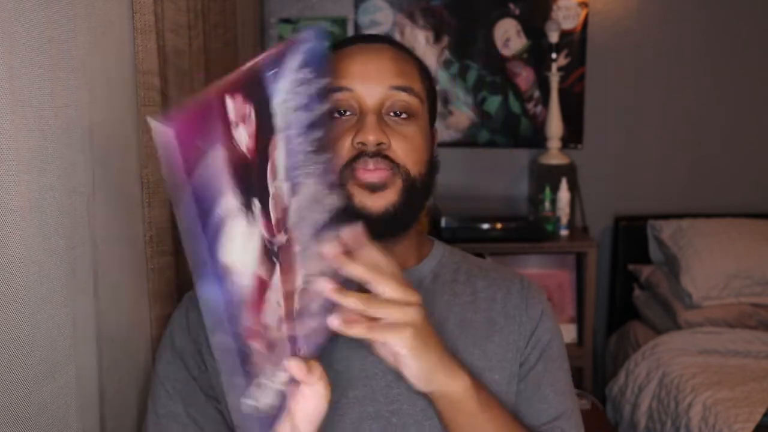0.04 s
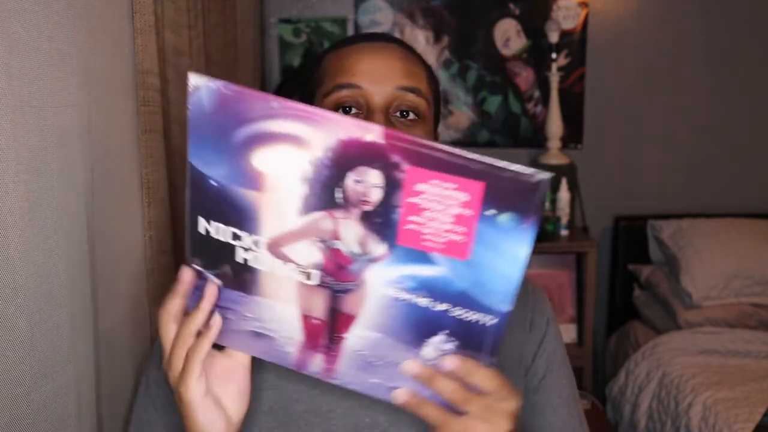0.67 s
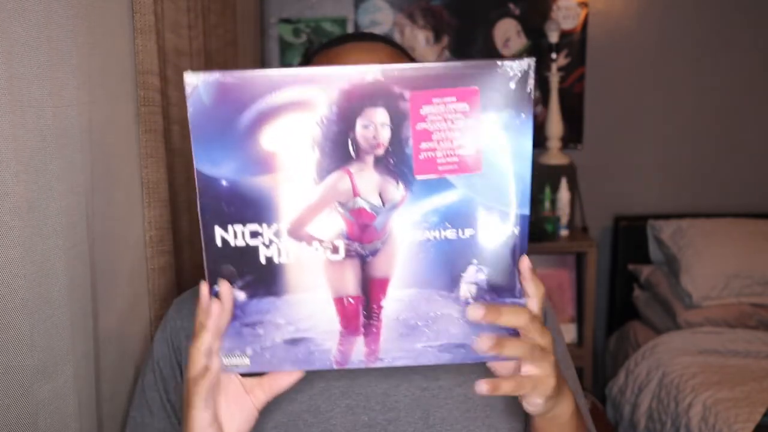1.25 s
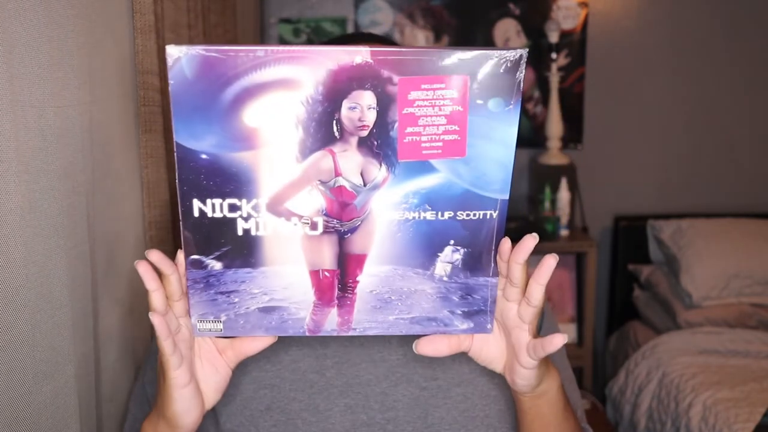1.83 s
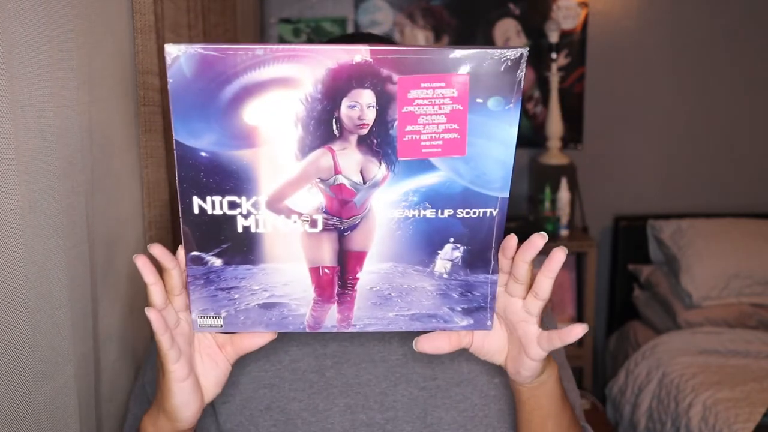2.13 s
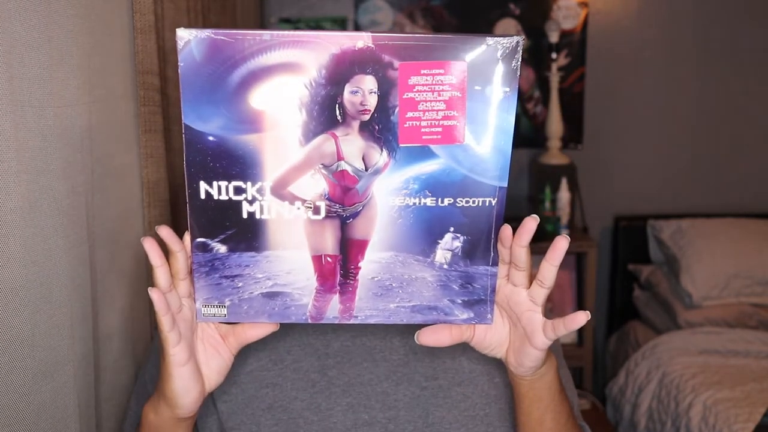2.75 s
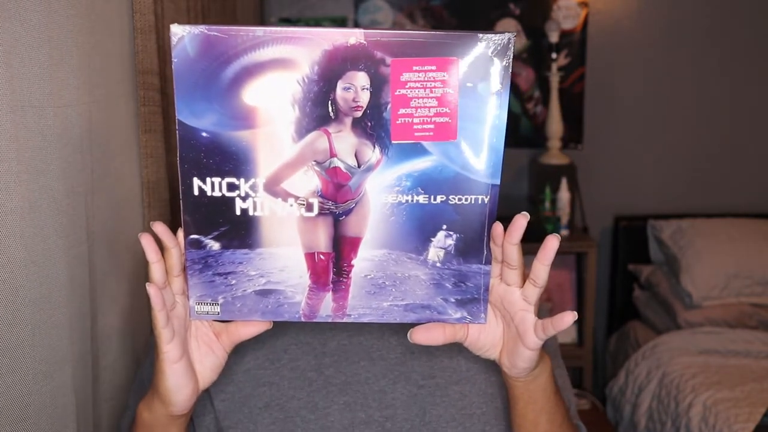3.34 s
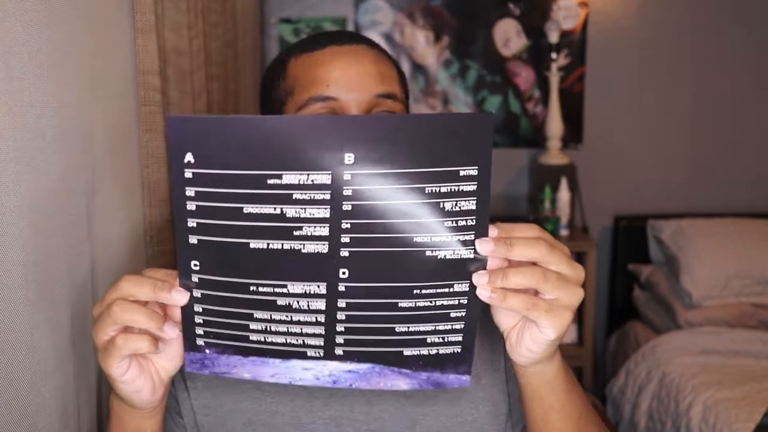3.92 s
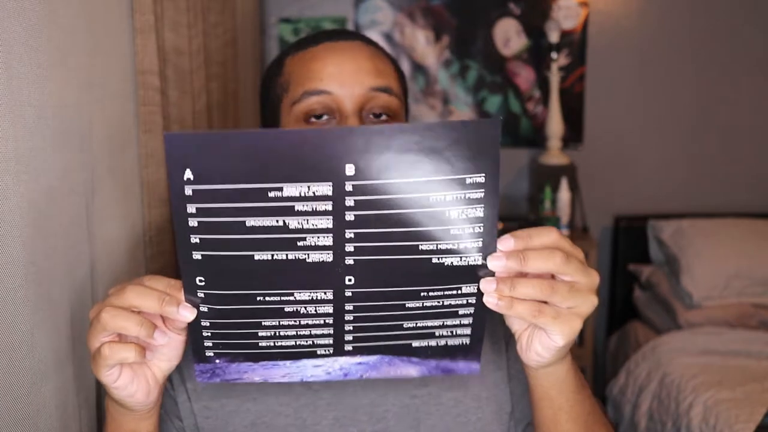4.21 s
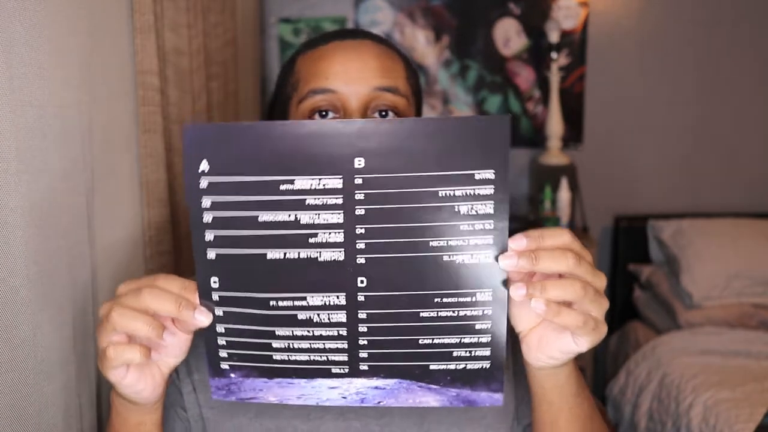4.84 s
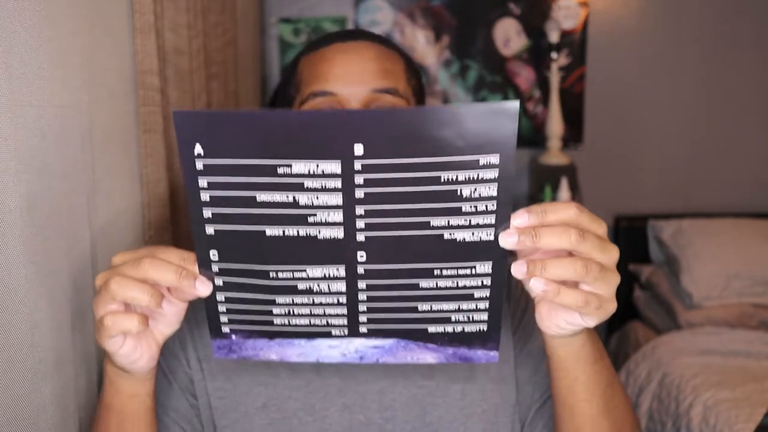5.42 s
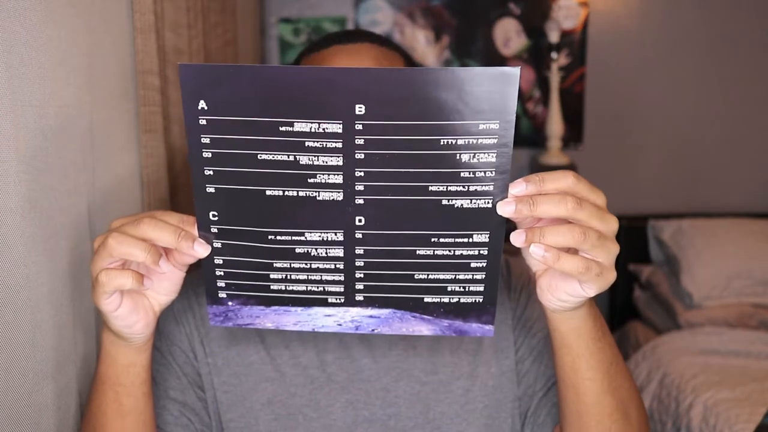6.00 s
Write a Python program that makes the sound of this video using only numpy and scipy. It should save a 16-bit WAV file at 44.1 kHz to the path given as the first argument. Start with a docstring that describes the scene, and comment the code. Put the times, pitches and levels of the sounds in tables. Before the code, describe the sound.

A ventilation fan hums low and steady throughout, with a soft rush of air in a small bedroom. Right at the start, close to the microphone, a shrink-wrapped record sleeve is turned in the hands with a sharp snap and a brief rasp. Fingers hiss across the plastic and drag on the card beneath, with a cluster of crackles, strongest from about 0.5 to 0.9 seconds. Lighter strokes fade out by 1.5 seconds, leaving only the fan. From about 3.75 to 4.6 seconds, a stiff paper insert gives a handful of light clicks as it flexes, among short, soft fingertip rustles with a slight squeak. A faint, smoother paper rustle swells from around 5 seconds and peaks just before the end at 6 seconds. The paper is quieter than the plastic, and both have only a short, slight room echo.

```python
"""A small bedroom, where a ventilation fan hums and its rushing air fills the room's low resonances.
Close to the microphone, hands turn over a shrink-wrapped record sleeve. Fingers hiss across the
plastic film, drag on the card beneath and make the wrap buckle with sharp snaps.
Later a stiff paper insert is held up: it rustles under the fingertips and clicks as it flexes."""
import sys
import numpy as np
from scipy import signal
from scipy.fft import rfft, irfft
from scipy.io import wavfile

SR = 44100
rng = np.random.default_rng(int(sys.argv[2]) if len(sys.argv) > 2 else 0)


def dump(signal):
    """Clip the signal to [-1, 1] and save it as 16-bit WAV at the path in sys.argv[1]."""
    limited = np.clip(np.atleast_2d(signal).T, -1, 1)
    pcm = np.round(limited * 32767).astype(np.int16)
    wavfile.write(sys.argv[1], SR, pcm)


N = 267687
TIME = np.arange(N) / SR
HZ = np.maximum(np.arange(N // 2 + 1) * SR / N, 1)


def from_db(db):
    """Turn decibels into a gain to multiply by."""
    return 10 ** (np.asarray(db) / 20)


def unit_power(x):
    """Scale a signal so its average power is 1."""
    return x / np.sqrt(np.mean(x ** 2) + 1e-20)


def gain_curve(points):
    """Join (Hz, dB) points into a gain for every frequency."""
    hz, db = np.transpose(points)
    return from_db(np.interp(np.log(HZ), np.log(hz), db))


def drift(rate_hz):
    """A slow random wobble, about 1 in size."""
    return unit_power(irfft(rfft(rng.standard_normal(N)) / (1 + (HZ / rate_hz) ** 2), N))


def resonate(x, hz, width_hz):
    """Ring at one pitch; a narrower width rings longer."""
    r = np.exp(-np.pi * width_hz / SR)
    feedback = [1, -2 * r * np.cos(2 * np.pi * hz / SR), r * r]
    return signal.lfilter(np.array([1, 0, -1]) * (1 - r * r) / 2, feedback, x + 1e-18)


def ring(x, modes):
    """Shake an object so all its modes (natural pitches) ring together."""
    return sum((-1) ** k * from_db(db) * unit_power(resonate(x, hz, width))
               for k, (hz, width, db) in enumerate(modes))


def stereo(pair, width, colour=1):
    """Make left and right from a mid (what both share) and a side (how they differ)."""
    mid, side = rfft(pair) * colour
    side = side * gain_curve(width)
    return irfft(np.array([mid + side, mid - side]), N)


def friction(slips_per_s, spread_db, smooth):
    """Skin sticks and slips: tiny uneven ticks over a smooth hiss."""
    slipping = rng.random(N) < slips_per_s / SR
    sizes = from_db(spread_db * np.minimum(rng.exponential(1, N), 4))
    ticks = unit_power(slipping * sizes * rng.choice([-1, 1], (2, N)))
    return unit_power(ticks + smooth * rng.standard_normal((2, N)))


def rub(peak_s, db, swell_s, fade_s, roundness=1.3):
    """A rub's loudness as the finger speeds up, then rests; roundness 1 is pointed, 2 is a bell."""
    from_peak = np.maximum((peak_s - TIME) / swell_s, (TIME - peak_s) / fade_s)
    return from_db(db) * np.exp(-np.minimum(from_peak, 8) ** roundness)


def together(gains):
    """Overlapping rubs add in power."""
    return np.sqrt(sum(gain ** 2 for gain in gains))


def flutter(rise_s, decay_s, size):
    """A quick dying shiver, evened out so it reaches every mode alike."""
    t = np.arange(size) / SR
    shape = (1 - np.exp(-t / rise_s)) * np.exp(-t / decay_s)
    spectrum = rfft(rng.standard_normal(size) * shape)
    shiver = irfft(spectrum / (np.abs(spectrum) + 1e-12), size) * shape ** .25
    return shiver / np.sqrt(np.sum(shiver ** 2))


def bedroom_echo(x, die_away_s=0.25, wall_hz=7000):
    """The walls return a short, soft tail, different on each side."""
    t = TIME[:SR // 2]
    tail = rng.standard_normal((2, len(t))) * from_db(-60 * t / die_away_s) * (t > .005)
    tail = signal.sosfilt(signal.butter(1, wall_hz, fs=SR, output="sos"), tail)
    return signal.fftconvolve(x, tail / np.sqrt(np.sum(tail ** 2) / 2), axes=1)[:, :N]


# Moving air. Each row: frequency in Hz, level in dB per Hz.
AIR_RUSH = [(12, -99), (29, -86), (42, -59), (78, -63.5), (140, -67), (250, -65), (420, -66.5), (520, -70),
            (700, -75), (900, -78.5), (1800, -87), (2080, -92.5), (7500, -104), (11000, -111),
            (15500, -113.5)]
# Room and duct resonances. Each row: pitch in Hz, width in Hz, peak level in dB per Hz.
ROOM_RESONANCES = [(54, 7.1, -58), (103, 7.3, -59), (119.6, 46, -57.5), (161.2, 15.4, -56),
                   (201, 9.3, -55.5), (209.4, 18, -59.5), (321, 4.7, -60.5), (334.4, 35, -64),
                   (417, 34, -61), (475.6, 15.5, -56), (535, 10, -66.5), (565.4, 15, -62.5),
                   (595, 13, -63.5), (618, 30.7, -63), (710, 27, -70), (759, 18, -69), (890, 13, -78.5),
                   (973, 19, -75.5), (1076, 17, -75.5), (1148, 25, -73.5), (1248, 17, -79), (1356, 29, -80),
                   (1670, 24, -84.5), (1903, 17, -84), (3970, 170, -101)]
# How wide the air sounds. Each row: frequency in Hz, side minus mid in dB.
ROOM_STEREO = [(40, -40), (110, -25), (200, -20.5), (380, -13.5), (480, -21), (620, -16.5), (900, -9),
               (1400, -6.5), (1850, -2.5), (2200, -1.5), (3000, 1.5), (6000, 0.5), (15000, 0.4)]
# Motor and mains hum. Each row: pitch in Hz, average level in dB.
HUM_TONES = [(36.5, -52), (58.6, -47.5), (113.6, -43), (119.9, -43.5), (170.6, -44), (340, -50)]

def fan(wander_hz=0.256, throb_db=-0.5, left_db=0.25):
    """Rushing air stirs the room's resonances while the motor's tones waver slightly."""
    power = gain_curve(AIR_RUSH) ** 2
    for hz, width, db in ROOM_RESONANCES:
        power += (from_db(db) / (1 + 2 * ((HZ - hz) / width) ** 2)) ** 2
    noise = rng.standard_normal((2, N)) * np.sqrt(SR / 2)
    air = stereo(noise, ROOM_STEREO, np.sqrt(power))
    hum = 0
    for hz, db in HUM_TONES:
        cycles = np.cumsum(hz + wander_hz * drift(1)) / SR + rng.random()
        gain = np.sqrt(2) * from_db(db + throb_db * drift(0.45))
        hum += gain * np.sin(2 * np.pi * cycles)
    return (air + hum) * from_db([[left_db], [-left_db]])


# The tone of rubbed paper. Each row: frequency in Hz, relative level in dB.
PAPER_TONE = [(700, -1), (1100, 7), (1800, 10.5), (2200, -5), (2600, 3), (3200, -2), (4280, -5), (4700, -7),
              (7000, -10.5), (11000, -14), (15500, -18)]
# How wide it sounds. Each row: frequency in Hz, side minus mid in dB.
PAPER_STEREO = [(1000, -5), (2300, -1), (3700, -4), (4400, 4), (6000, 5), (15000, -3)]
# Fingertips creeping on the insert. Each row: fastest moment in seconds, level in dB,
# swell and fade in seconds, squeak pitch in Hz, squeak level against the rustle in dB.
PAPER_CREEPS = [(3.850, -61, .02, .04, 3700, -1), (3.935, -61, .03, .04, 3600, -5),
                (4.000, -52.5, 0.041, 0.033, 3560, -5), (4.092, -54, 0.028, 0.027, 3800, -1.5),
                (4.135, -57, 0.02, .025, 3720, -2), (4.235, -56.5, 0.1, 0.14, 3640, -5),
                (4.390, -56.5, .023, 0.013, 3800, -5), (4.610, -65, .06, .04, 3900, -4),
                (5.900, -57.5, 0.67, 0.45, 3800, -20)]

def insert_rustle(squeak_filter_width_hz=720):
    """Fingertips rustle on paper; skin catching quickly and almost regularly adds a soft squeak."""
    slips = friction(slips_per_s=4000, spread_db=5.5, smooth=1.2)
    rustle = unit_power(stereo(slips, PAPER_STEREO, gain_curve(PAPER_TONE)))
    catches = stereo(rng.standard_normal((2, N)), PAPER_STEREO)
    out = 0
    for peak_s, db, swell_s, fade_s, hz, squeak_db in PAPER_CREEPS:
        pitched = resonate(catches, hz, squeak_filter_width_hz)
        squeak = unit_power(resonate(pitched, hz, squeak_filter_width_hz))
        out += rub(peak_s, db, swell_s, fade_s) * (rustle + from_db(squeak_db) * squeak)
    return out


# A buckle comes from one spot, so it sounds narrow. Each row: frequency in Hz, side minus mid in dB.
BUCKLE_STEREO = [(900, -7), (1600, -4), (2600, -9), (4800, -1), (6200, 2.5), (15000, -4)]

def buckles(events, modes, level_db, rise_s=0.0051, patch_width_hz=700, size=4096):
    """Each buckle rings the sheet, tuned by how far it is bent, with a thin crack from its surface."""
    out, left_db = np.zeros((2, N + size)), np.zeros(N)
    treble = signal.butter(2, 1400, "high", fs=SR, output="sos")
    for start_s, db, patch_hz, patch_db, crack_db, decay_s, stiffening, pan_db in events:
        start = round(start_s * SR)
        left_db[start:] = pan_db / 2
        bent_modes = [(hz * stiffening, width, mode_db) for hz, width, mode_db in modes]
        for channel in range(2):  # mid, then side
            shiver = flutter(rise_s, decay_s, size)
            crack = unit_power(signal.sosfilt(treble, shiver))
            snap = ring(shiver, bent_modes) + from_db(crack_db) * crack
            snap += (from_db(patch_db) - 1) * resonate(snap, patch_hz, patch_width_hz)
            power = np.sum(snap ** 2) / (decay_s * SR)
            out[channel, start:start + size] += from_db(db + level_db) * snap / np.sqrt(power)
    return stereo(out[:, :N], BUCKLE_STEREO) * from_db([left_db, -left_db])


# How the insert rings. Each row: pitch in Hz, width in Hz, relative level in dB.
PAPER_RING = [(950, 190, 2), (1260, 230, 5.5), (1680, 280, -0.5), (2440, 260, -7), (3800, 540, -11)]
# The insert buckling. Each row: start in seconds, relative level in dB, pitch of the buckling patch
# in Hz, its boost in dB, crack level against the ring in dB, flutter decay in seconds,
# how much the bend multiplies the ringing pitches, left minus right in dB.
PAPER_BUCKLES = [(3.7570, -30.5, 3900, 8.3, 0, 0.00062, 1.01, 0),
                 (3.8800, -33, 2620, 27, -16, 0.0022, 1.05, 0), (4.0210, -28, 3800, 7, -8, 0.0012, 1.08, 2),
                 (4.2440, -26, 1150, 12, -30, 0.003, 0.83, -.5),
                 (4.5910, -29, 1550, 12, -28, 0.0023, 1.03, 2), (4.6240, -46, 4150, 20, -8, .002, 1.01, 0)]

def insert_flexes():
    """The stiff paper clicks as it gives under the thumbs."""
    return buckles(PAPER_BUCKLES, PAPER_RING, level_db=-8.5)


# The tone of rubbed film. Each row: frequency in Hz, relative level in dB.
FILM_TONE = [(700, -33), (1200, 1), (1800, 7), (2300, -2.5), (3100, 2), (3900, 3), (6500, 0.8), (9000, -4),
             (11500, -9), (15500, -12)]
# How wide it sounds. Each row: frequency in Hz, side minus mid in dB.
FILM_STEREO = [(800, -5), (1600, -6), (2200, -6), (2700, 2.5), (5000, -5.5), (9000, 0), (15000, -4)]
# Finger strokes on the film. Each row: fastest moment in seconds, relative level in dB,
# swell and fade in seconds, top treble boost in dB.
FILM_STROKES = [(.010, -53, 0.035, 0.16, 8), (.105, -60, .025, .022, 11), (.240, -61.5, .02, .025, -1),
                (.385, -58.5, 0.035, .05, 3), (.485, -53, 0.038, 0.022, 5), (.565, -53, 0.05, .03, 10),
                (.605, -46.5, 0.075, 0.051, 7.5), (.682, -55.2, .035, 0.054, 11),
                (.838, -54, 0.089, 0.026, -3), (.876, -54.5, .018, 0.02, 0), (.975, -64, 0.13, 0.13, 5),
                (1.068, -63, .02, .018, 2), (1.220, -60, 0.083, .07, 3), (1.298, -60.5, .04, 0.047, 6),
                (1.410, -63, .044, .05, 3)]

def film_hiss(level_db=5.5, top_hz=11500):
    """Skin hisses as it slides over the wrap; tight film sounds brighter."""
    slips = friction(slips_per_s=3500, spread_db=0.5, smooth=1.3)
    hiss = unit_power(stereo(slips, FILM_STEREO, gain_curve(FILM_TONE)))
    top = irfft(rfft(hiss) / (1 + (top_hz / HZ) ** 8), N)
    sliding = together(rub(*stroke) for *stroke, _ in FILM_STROKES)
    brightness = together(rub(*stroke) * from_db(top_db) for *stroke, top_db in FILM_STROKES)
    return from_db(level_db) * (sliding * (hiss - top) + brightness * top)


# How the wrapped card rings. Each row: pitch in Hz, width in Hz, relative level in dB.
CARD_RING = [(1540, 260, 8.5), (1865, 510, 3), (2590, 340, 1.5), (3280, 320, -3), (4000, 460, -7),
             (4860, 240, -6), (5200, 450, -7.5)]
# The whole sleeve's low thrum. Each row: pitch in Hz, width in Hz, relative level in dB.
SLEEVE_THRUM = [(236, 54, -3), (397, 110, 0), (585, 150, -3.5)]
# A soft fingertip favours the card's lower pitches. Each row: frequency in Hz, relative level in dB.
DRAG_TONE = [(700, -3), (1150, 6), (1550, -9), (1950, 2), (2300, -3.5), (4000, -5), (7000, -16)]
# The broad card sounds much alike on both sides. Each row: frequency in Hz, side minus mid in dB.
CARD_STEREO = [(300, -17), (700, -14), (1600, -13), (2200, -2)]
# Firm grips. Each row: hardest moment in seconds, relative level in dB, swell and fade in seconds.
CARD_GRIPS = [(.012, -40.5, 0.018, 0.019), (.527, -48, .012, 0.023), (.630, -47, 0.03, .015),
              (.658, -45, 0.008, .016), (.686, -44, 0.023, 0.026), (.876, -46, 0.039, 0.017),
              (1.068, -51, 0.016, .019)]

def card_drag(rasp_db=-1.0, thrum_db=8.5, thrum_top_hz=750):
    """Coarser slips shake the card: it rasps under a grip and thrums faintly under each stroke."""
    slips = friction(slips_per_s=1200, spread_db=3.5, smooth=1.0)
    rasp = unit_power(stereo(ring(slips, CARD_RING), CARD_STEREO, gain_curve(DRAG_TONE)))
    lows_only = 1 / (1 + (HZ / thrum_top_hz) ** 6)
    thrum = unit_power(stereo(ring(slips, SLEEVE_THRUM), CARD_STEREO, lows_only))
    gripping = together(rub(*grip) for grip in CARD_GRIPS)
    sliding = together(rub(*stroke) for *stroke, _ in FILM_STROKES)
    return from_db(rasp_db) * gripping * rasp + from_db(thrum_db) * sliding * thrum


# Film and card buckling. Each row reads like a row of PAPER_BUCKLES.
WRAP_BUCKLES = [(.0038, -22, 1050, 5, -6, 0.0025, 1.07, 6), (.0180, -27.5, 3700, 20, -12, 0.0018, 0.94, -2),
                (.028, -34, 2570, 5, -11, 0.0017, 1, 0), (.3945, -28.5, 1450, 3, -5, 0.0021, 0.99, -1),
                (.5100, -20.5, 5150, 4, -13, 0.0023, 0.99, 0), (.5965, -35, 11000, 8, 12, .0009, 0.96, 0),
                (.6470, -29.5, 1600, 16, -16, 0.0044, 1, -8), (.6620, -35, 4200, 8, -7, 0.0022, 1.08, 1),
                (.6780, -35, 1550, 16, -16, 0.0058, .98, -2), (.7980, -41, 11000, 6, 12, .0012, 1.05, -2),
                (.8140, -33, 2650, 17, -9, 0.0014, 0.93, 1), (.8330, -38.5, 3530, 18, -2, 0.0044, 0.99, -5),
                (.8680, -41, 7500, 8, 4, .0012, 1.2, 1), (.8750, -40, 5100, 11, 4, .002, 0.99, 1),
                (.8820, -40.5, 1750, 6, 1, .0014, 1.3, 0), (.9540, -45, 6000, 3, 6, .0012, 1.01, 0),
                (.9990, -43, 8300, 14, 4, 0.0018, 1.01, 2)]

def wrap_snaps():
    """The wrap buckles with a snap and rings the card beneath."""
    return buckles(WRAP_BUCKLES, CARD_RING, level_db=-6.5)


def scene():
    """The hands close by, the room and its fan behind."""
    hands = film_hiss() + card_drag() + wrap_snaps() + insert_rustle() + insert_flexes()
    return hands + from_db(-10.5) * bedroom_echo(hands) + fan()


def record(dry, right_lag_s=.00005, cutoff_hz=15700):
    """A stereo microphone: sound reaches its right side a little later, and the top is cut steeply."""
    lag = np.exp(-2j * np.pi * HZ * np.array([[0], [right_lag_s]]))
    top_cut = 1 / np.sqrt(1 + (HZ / cutoff_hz) ** 600)
    return irfft(rfft(dry) * lag * top_cut, N)


dry = scene()
out = record(dry)
dump(out)
```